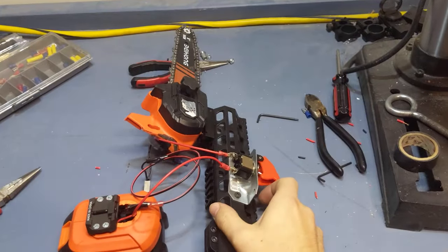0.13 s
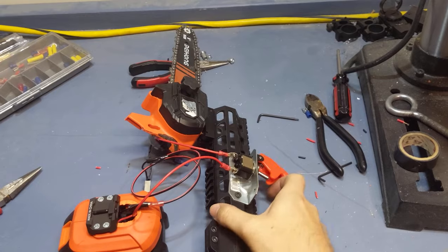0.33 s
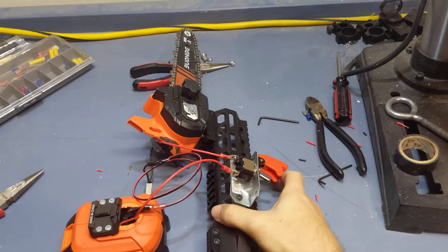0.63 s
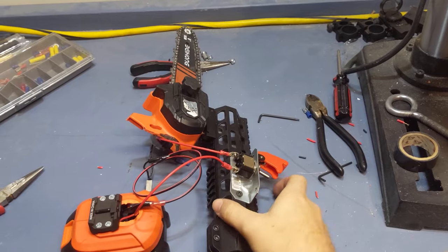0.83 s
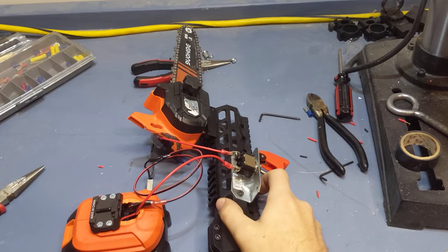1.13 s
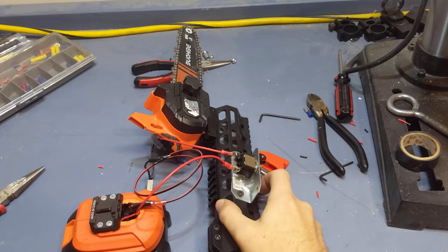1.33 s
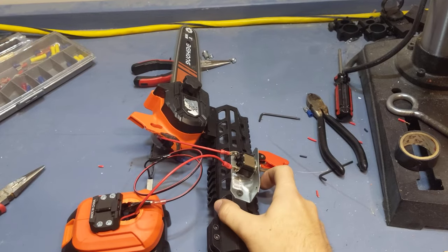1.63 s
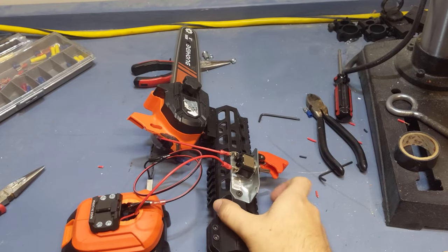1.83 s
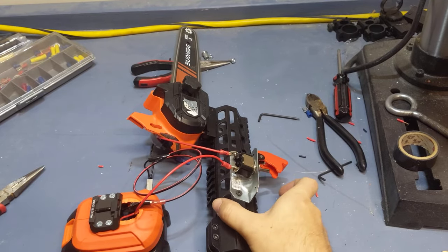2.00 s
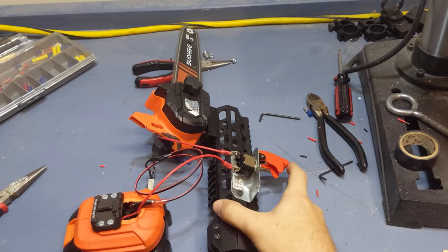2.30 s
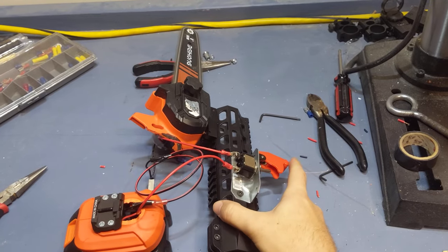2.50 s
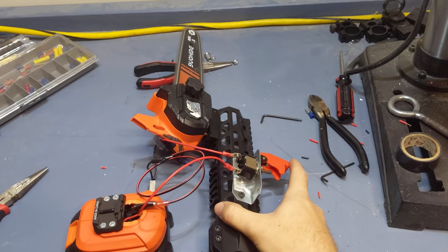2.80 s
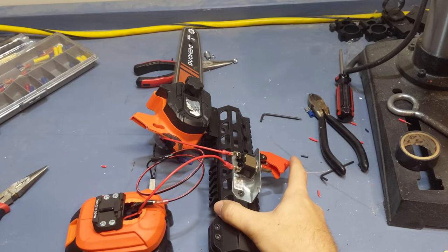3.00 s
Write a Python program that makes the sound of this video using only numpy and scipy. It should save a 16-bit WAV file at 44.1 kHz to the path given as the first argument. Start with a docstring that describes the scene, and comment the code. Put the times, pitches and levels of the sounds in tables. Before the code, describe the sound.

In a small indoor workshop, soft grip sliding and a few plastic clicks precede a battery chainsaw starting abruptly, its hissy metallic chain rattle and motor whine holding steady to the end, close microphone.

```python
"""In a still workshop with a low rumble, a hand slides on the grip of a small battery chainsaw on a bench.
Its trigger clicks, coloured noise bursts between dull knock and bright tick, while a low hum swells once.
Then the motor jerks into life: the chain snaps taut, the body rocks and a few tones howl on the run-up.
At full speed, dense random ticks ring the casing as chain rattle, under shaft hum and whine made of
sines locked to the motor speed and a low drone of fixed pitch."""
import sys
import numpy as np
from scipy import signal
from scipy.fft import rfft, irfft
from scipy.io import wavfile

SR = 44100
rng = np.random.default_rng(int(sys.argv[2]) if len(sys.argv) > 2 else 0)


def inscribe(sig):
    """Save sig as 16-bit PCM at rate SR to the path in sys.argv[1].

    A 1-D sig is mono; a 2-D sig holds one channel per row.
    Samples are clipped to [-1, 1] before scaling.
    """
    pcm = np.round(np.clip(np.atleast_2d(sig).T, -1, 1) * 32767)
    wavfile.write(sys.argv[1], SR, pcm.astype(np.int16))


N = 138915
T = np.arange(N) / SR  # seconds
HZ = np.fft.rfftfreq(N, 1 / SR)

START_S, SPIN_UP_S = 1.602, 0.042  # the switch closes; time constant of the run-up
# Speed the motor pulls towards; it dips, then creeps up as the chain loosens.
# Each row: time in seconds, shaft speed in turns per second.
TARGET_SPEED = [(1.7, 352), (1.8, 348.2), (1.9, 348.5), (2.01, 349.4), (2.15, 353.5), (2.4, 355.2),
                (3.15, 355.4)]
WAVER, WAVER_HZ = 0.00054, 30.2  # rms speed waver as a fraction, and its fastest rate

# Colour of the chain rattle at full speed.
# Each row: frequency in Hz, left in relative dB, right in relative dB.
CHAIN_COLOUR = [(50, -68, -72), (160, -67, -67), (430, -63.5, -69), (544, -69, -74.5), (1150, -66, -69),
                (2730, -54, -65.5), (3270, -52.5, -53.5), (5920, -49.5, -58), (6300, -59.5, -57.5),
                (7480, -53.5, -57.5), (10700, -60, -60.5), (13720, -50, -62), (14280, -44.5, -60),
                (16180, -54.5, -83)]
# Resonances of bar and casing.
# Each row: centre in Hz, width in Hz, left lift in dB, right lift in dB.
CASING_RESONANCES = [(1345, 71, 5.5, 5.5), (1638, 56, 9, 6), (1800, 87, 4.5, -9), (2220, 37, 6, 6.5),
                     (2324, 236, 4.5, 1), (3277, 177, 7, 3), (3930, 190, 5, 1.5), (4745, 250, 5, 7),
                     (9610, 630, 4, 4.5), (11500, 470, -1.5, 4.5)]
CHAIN_DB, EASE_DB_PER_S = -13, -0.14  # level at the start; the rattle eases as the chain settles
PULL_TREBLE_DB, PULL_BASS_DB = 7.5, 18.5  # lift under full torque
LINKS_PER_TURN, LINK_DEPTH = 2.357, 0.3  # links per shaft turn; swing of the tick rate as a fraction
TICKS_PER_S, TICK_SPREAD_DB = 22000, 1.5  # mean rate; chance spread of strength
SURGE_DB, SURGE_HZ = 0.35, 25  # rms drift of the rattle's level, and its fastest rate

# Hum and whine of motor and gear, early on and once the saw has settled.
# Each row: multiple of the shaft speed, early left in dB, early right in dB, late left in dB,
# late right in dB, phase lead of the right channel in radians. Levels are nominal, at full speed.
MOTOR_TONES = [(1, -44.5, -47, -39.5, -42, 1.03), (3, -47, -51.5, -59, -65, 0.1),
               (12, -22.5, -31.5, -37, -28.5, 1.63), (14, -25.5, -44, -31, -41, 1.4),
               (18, -48, -52, -41, -48, 1.0)]
SETTLE_FROM_S, SETTLE_TO_S = 1.98, 2.8
TONE_ONSET = 5.0  # power of the relative speed
FLUTTER_DB, FLUTTER_HZ = 2.0, 17  # rms drift of each tone's level, and its fastest rate
# Tones that howl on the way up. Each row: middle in seconds, half length in seconds,
# multiple of the shaft speed, level in dB before the run-up scales it, width in Hz.
RUN_UP_HOWLS = [(1.674, .03, 13.8, -22, 170), (1.655, 0.07, 2.7, -37.5, 98), (1.71, 0.023, 9.7, -26, 93)]
# A low drone beside the hum. The row: pitch in Hz, width in Hz, level in dB at full speed.
LOW_DRONE = (216, 4.2, -50.5)

# The chain snaps taut. The row: start in seconds, level in dB, decay t60 in seconds.
CHAIN_SNAP = (1.603, -10, 0.031)
# Colour of the snap. Each row: frequency in Hz, level in relative dB.
SNAP_COLOUR = [(60, -7), (600, -13), (1200, -17), (3200, 0), (5500, 1), (7000, -2), (12000, 1), (15500, -2)]
SNAP_ATTACK_S = 0.0029
# The motor's kick rocks the body. Each row: pitch in Hz, level in dB, decay t60 in seconds.
BODY_KICK = [(140, -36, 0.11), (413, -39, 0.36)]

# The hand slides on the grip.
# Each row: middle in seconds, half length in seconds, level in dB before panning.
GRIP_SLIDES = [(0.276, 0.068, -68), (.39, 0.093, -64.5), (0.518, 0.061, -56), (0.612, 0.066, -67.5),
               (0.928, 0.12, -65.5)]
# Colour of skin on plastic. Each row: frequency in Hz, level in relative dB.
SKIN_COLOUR = [(100, 13.5), (600, -2), (1500, 2), (5500, -0.5), (7000, -3.5), (15000, -8.5)]
# Trigger clicks. Each row: start in seconds, level in dB before panning,
# brightness from 0 to 1, decay t60 in seconds.
TRIGGER_CLICKS = [(0.477, -42.5, 0.47, 0.065), (0.505, -41, 0.07, 0.064), (.852, -59.5, 0, 0.036),
                  (1.266, -37, 1.0, 0.0096), (1.279, -67, .95, .014), (1.555, -65, 0, .06)]
# Colour of a click. Each row: frequency in Hz, dull plastic knock in relative dB,
# bright switch tick in relative dB.
KNOCK_AND_TICK = [(200, -8, -25), (550, -5, -33), (940, 3.5, -38), (1700, -8, -28), (3130, -13, -16),
                  (4100, 1, -12), (5400, -15, -7), (6700, -16, -9), (7500, -12, 7), (8560, -23, -7),
                  (9200, -24, 12), (12500, -37, -6), (15500, -27, -12)]
HAND_PAN_DB = 2.5  # left up, right down

# Colour of the still workshop. Each row: frequency in Hz, level in relative dB.
WORKSHOP_COLOUR = [(12, -36), (20, 3), (77, -12.5), (113, -6), (142, -6), (158, -19.5), (328, -23),
                   (558, -33.5), (897, -29.5), (1120, -39), (1400, -38.5), (16000, -46.5)]
FLOOR_DB, FLOOR_PAN_DB = -55.5, 1  # level before panning; left up, right down
# A low hum that swells. The row: pitch in Hz, width in Hz, level in dB at its peak.
LOW_MURMUR = (115, 16, -53.5)
MURMUR_S, MURMUR_HALF_S = 1.3, 0.17  # middle and half length

# Likeness of the two channels. Each row: frequency in Hz, likeness from -1 to 1.
LIKENESS = [(50, 1), (350, 0.68), (600, 0.3), (1100, 0.76), (1800, 0.56), (2250, -.3), (3250, 0.49),
            (3700, -.15), (5000, 0.06), (15000, 0)]
ROOM_T60_S, ROOM_DB = 0.36, -12.5  # decay and level of the reflections
EDGE_HZ = 15800  # top of the band


def amp(db):
    """Decibels to gain."""
    return 10 ** (np.asarray(db) / 20)


def unit(x):
    """Scales to rms 1."""
    return x / np.sqrt(np.mean(x ** 2) + 1e-20)


def read(table, axis=1):
    """Reads one column of a table over log frequency."""
    columns = np.transpose(table)
    return np.interp(np.log(HZ + 1), np.log(columns[0]), columns[axis])


def colour(x, db):
    """Filters by a gain curve; rms 1."""
    return unit(irfft(rfft(x) * amp(db), N))


def lowpass(x, hz):
    """Smoothly removes what lies above a frequency, with no phase shift."""
    return irfft(rfft(x) / (1 + (HZ / hz) ** 4), N)


def drift(hz):
    """Slow chance movement up to a rate; rms 1."""
    return unit(lowpass(rng.standard_normal(N), hz))


def swell(middle, half):
    """A smooth rise and fall."""
    return np.exp(-((T - middle) / half) ** 2)


def pair(x):
    """Makes two unrelated signals as alike as LIKENESS says at each frequency."""
    a, b = rfft(x)
    same = np.clip(read(LIKENESS), -1, 1)
    return irfft(np.array([a, same * a + np.sqrt(1 - same ** 2) * b]), N)


def noise(db):
    """Coloured noise in both channels."""
    return colour(pair(rng.standard_normal((2, N))), db)


def fuzzy(turns, width_hz):
    """A narrow band of noise riding on a pitch."""
    phase = 2 * np.pi * turns
    cosine_part = drift(width_hz / 2) * np.cos(phase)
    sine_part = drift(width_hz / 2) * np.sin(phase)
    return unit(cosine_part + sine_part)


def burst(start, db, t60, attack_s=0.0014):
    """Envelope of a blow: short linear attack, exponential decay."""
    age = np.maximum(T - start, 0)
    return np.minimum(age / attack_s, 1) * amp(db - 60 * age / t60)


def pan(db):
    """Gains that lift the left channel and lower the right."""
    return amp([[db], [-db]])


def chain(speed, turns):
    """Dense ticks of links on bar and sprocket ring the casing; bass and treble lift as the motor pulls."""
    rate = TICKS_PER_S * (1 + LINK_DEPTH * np.cos(2 * np.pi * LINKS_PER_TURN * turns))
    hits = rng.random((2, N)) < rate / SR
    signs = rng.choice([-1, 1], (2, N))
    ticks = hits * signs * amp(TICK_SPREAD_DB * rng.standard_normal((2, N)))

    shape = np.array([read(CHAIN_COLOUR, axis=1), read(CHAIN_COLOUR, axis=2)])
    for hz, width, left_db, right_db in CASING_RESONANCES:
        bump = 0.5 ** ((2 * (HZ - hz) / width) ** 2)
        shape = shape + np.array([[left_db], [right_db]]) * bump
    rattle = colour(pair(ticks), shape)

    bass = lowpass(rattle, 1500)
    treble = rattle - bass
    pull = 1 - speed  # torque is greatest at standstill
    rattle = bass * amp(PULL_BASS_DB * pull) + treble * amp(PULL_TREBLE_DB * pull)
    level_db = CHAIN_DB + EASE_DB_PER_S * (T - START_S) + SURGE_DB * drift(SURGE_HZ)
    return speed * rattle * amp(level_db)


def motor(speed, turns):
    """Hum and whine on exact multiples of shaft speed grow with its power; howls cross the run-up."""
    settled = np.interp(T, [SETTLE_FROM_S, SETTLE_TO_S], [0, 1])
    tones = np.zeros((2, N))
    for multiple, early_left, early_right, late_left, late_right, lead in MOTOR_TONES:
        early = np.array([[early_left], [early_right]])
        late = np.array([[late_left], [late_right]])
        flutter = FLUTTER_DB * np.array([drift(FLUTTER_HZ), drift(FLUTTER_HZ)])
        tone = unit(np.sin(2 * np.pi * multiple * turns + np.array([[0], [lead]])))
        tones += amp(early + (late - early) * settled + flutter) * tone

    howl = np.zeros(N)
    for middle, half, multiple, db, width in RUN_UP_HOWLS:
        howl += amp(db) * swell(middle, half) * fuzzy(multiple * turns, width)

    hz, width, db = LOW_DRONE
    drone = amp(db) * fuzzy(hz * T, width)
    return (tones + drone) * speed ** TONE_ONSET + howl * speed


def jerk():
    """The slack chain snaps taut as a noise burst; the body rocks on the bench as decaying sines."""
    out = noise(read(SNAP_COLOUR)) * burst(*CHAIN_SNAP, attack_s=SNAP_ATTACK_S)
    start = CHAIN_SNAP[0]
    for hz, db, t60 in BODY_KICK:
        out += burst(start, db, t60) * np.sin(2 * np.pi * hz * (T - start))
    return out


def hand():
    """Skin slides on plastic as swelling noise; the trigger knocks and its switch ticks in bursts."""
    slides = sum(amp(db) * swell(middle, half) for middle, half, db in GRIP_SLIDES)
    out = noise(read(SKIN_COLOUR)) * slides
    dull, sharp = read(KNOCK_AND_TICK, axis=1), read(KNOCK_AND_TICK, axis=2)
    for start, db, bright, t60 in TRIGGER_CLICKS:
        out += noise(dull + bright * (sharp - dull)) * burst(start, db, t60)
    return out * pan(HAND_PAN_DB)


def workshop():
    """Low rumble and faint hiss as steady noise, with a narrow-band hum that swells once."""
    floor = amp(FLOOR_DB) * pan(FLOOR_PAN_DB) * noise(read(WORKSHOP_COLOUR))
    hz, width, db = LOW_MURMUR
    return floor + amp(db) * swell(MURMUR_S, MURMUR_HALF_S) * fuzzy(hz * T, width)


def room(x):
    """Adds sparse decaying reflections of a small room, different for each channel."""
    t = np.arange(SR // 2) / SR
    taps = rng.standard_normal((2, len(t)))
    taps *= rng.random((2, len(t))) < 0.06  # sparse
    taps *= (t > 0.002) * amp(-60 * t / ROOM_T60_S)
    taps /= np.linalg.norm(taps, axis=1, keepdims=True)
    return x + amp(ROOM_DB) * signal.fftconvolve(x, taps, axes=1)[:, :N]


def scene():
    """One motor speed drives chain and tones; only the chain and its jerk excite the room."""
    speed = 1 - np.exp(-np.maximum(T - START_S, 0) / SPIN_UP_S)  # 0 to 1
    target = np.interp(T, *np.transpose(TARGET_SPEED))
    turns = np.cumsum(speed * target * (1 + WAVER * drift(WAVER_HZ))) / SR
    return room(chain(speed, turns) + jerk()) + motor(speed, turns) + hand() + workshop()


def record(dry):
    """Limits the band with a steep linear-phase low-pass."""
    lowpass_taps = signal.firwin(511, EDGE_HZ, window=("kaiser", 8), fs=SR)
    return signal.oaconvolve(dry, lowpass_taps[None], "same")


dry = scene()
out = record(dry)
inscribe(out)
```